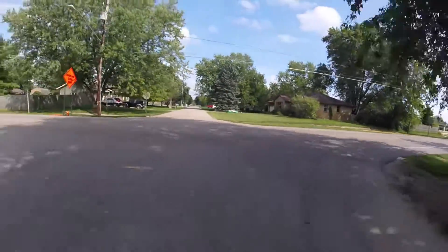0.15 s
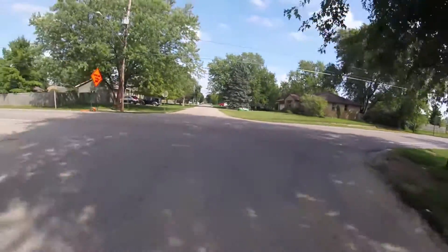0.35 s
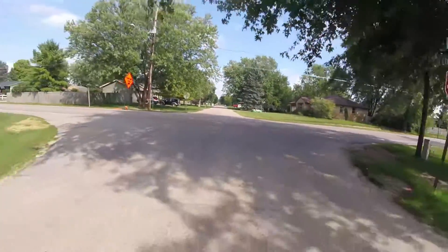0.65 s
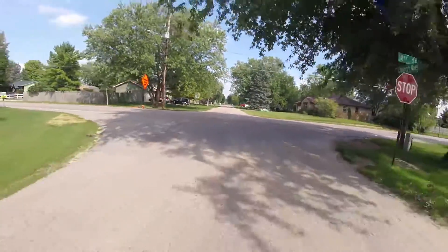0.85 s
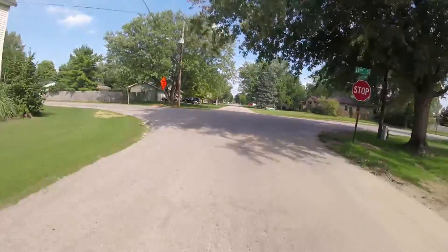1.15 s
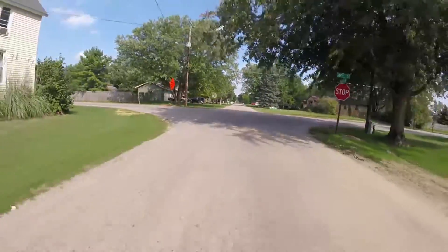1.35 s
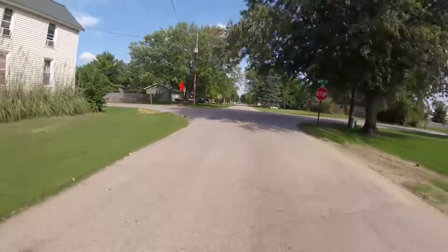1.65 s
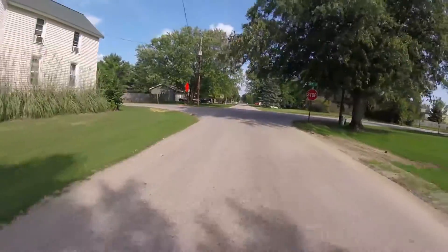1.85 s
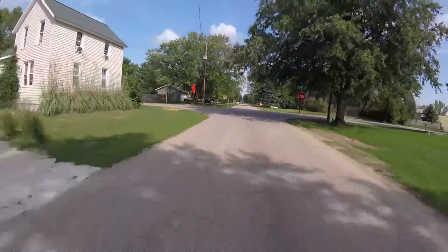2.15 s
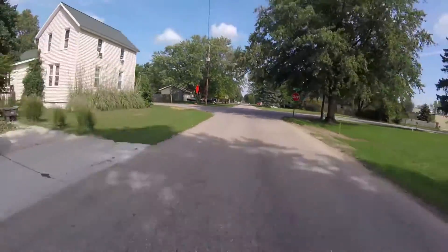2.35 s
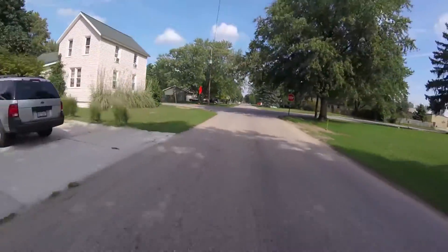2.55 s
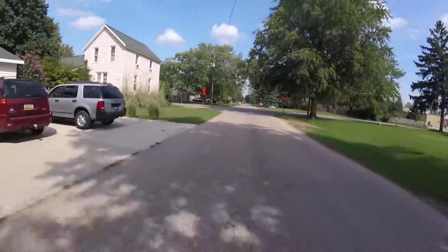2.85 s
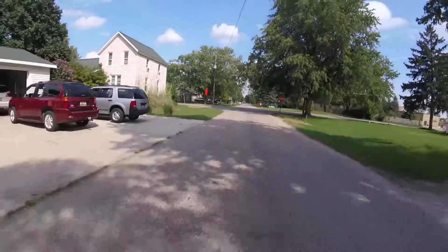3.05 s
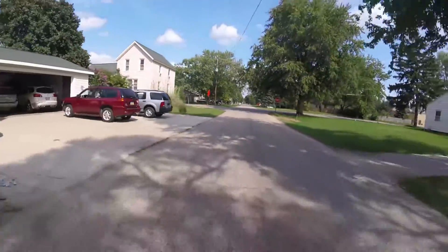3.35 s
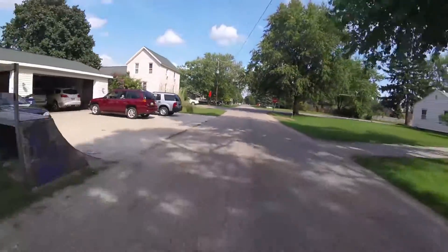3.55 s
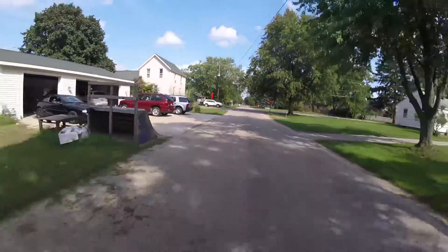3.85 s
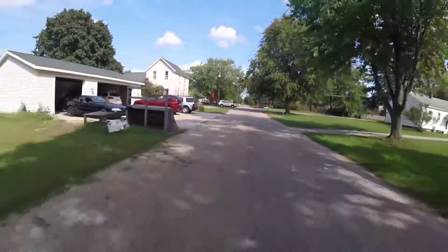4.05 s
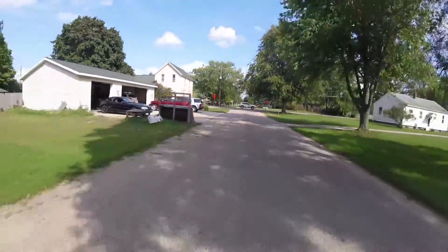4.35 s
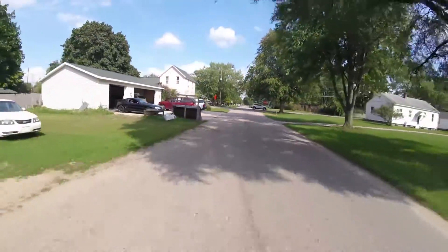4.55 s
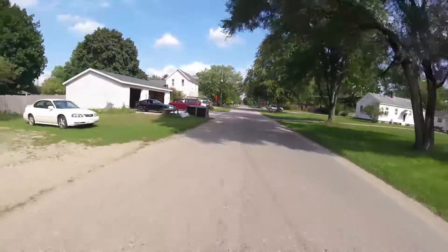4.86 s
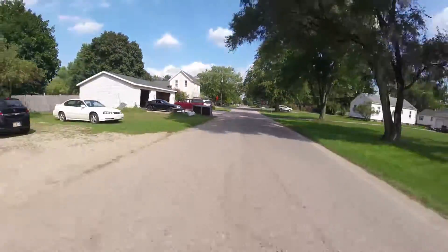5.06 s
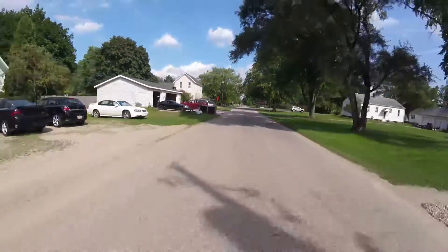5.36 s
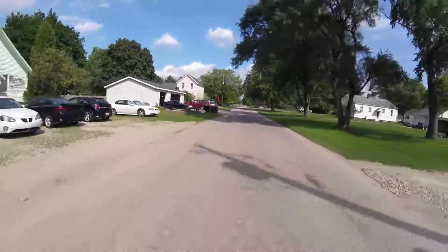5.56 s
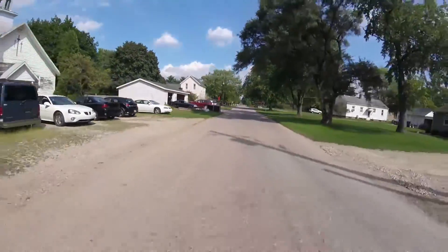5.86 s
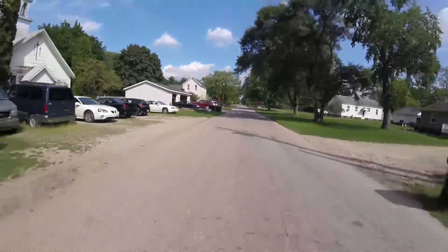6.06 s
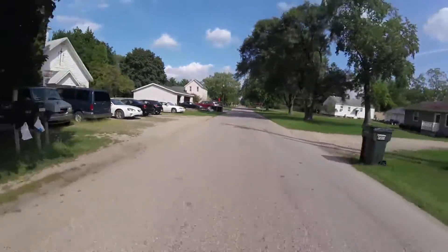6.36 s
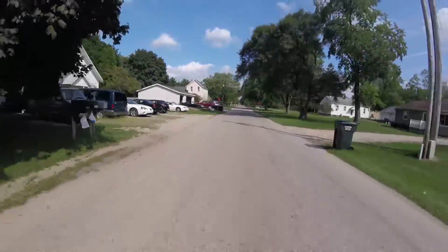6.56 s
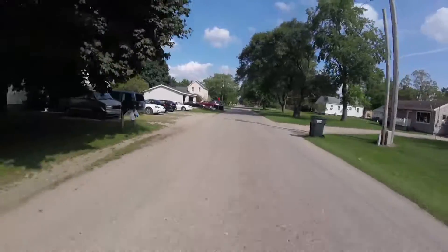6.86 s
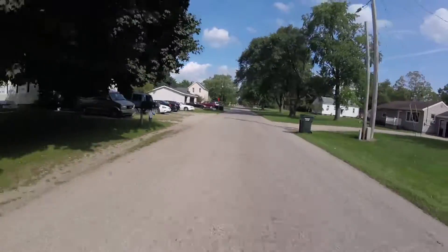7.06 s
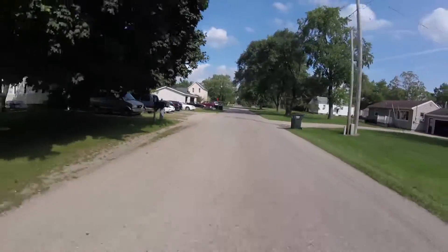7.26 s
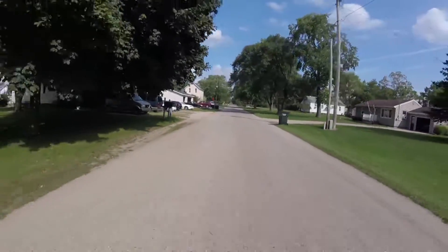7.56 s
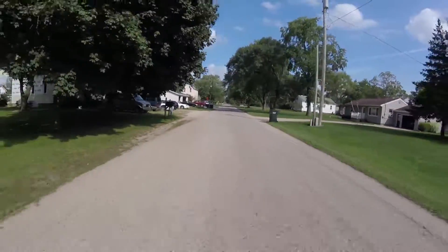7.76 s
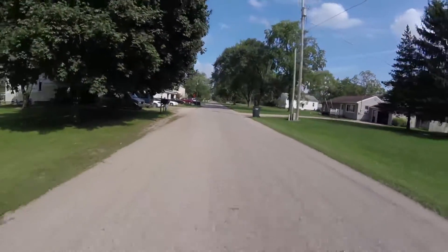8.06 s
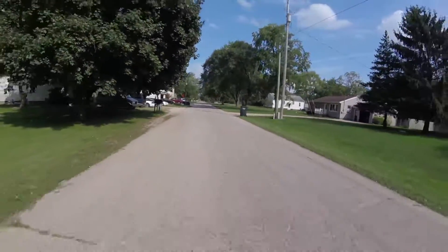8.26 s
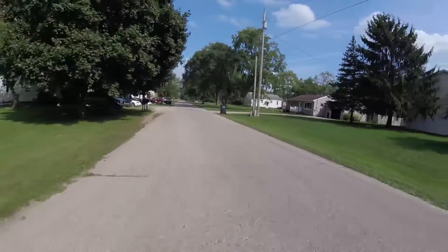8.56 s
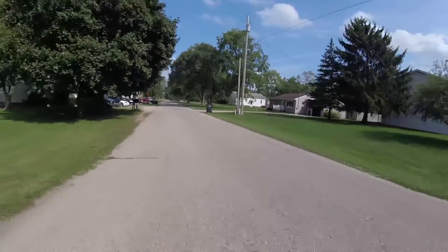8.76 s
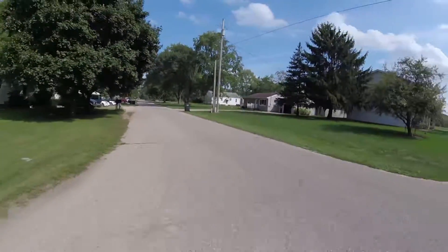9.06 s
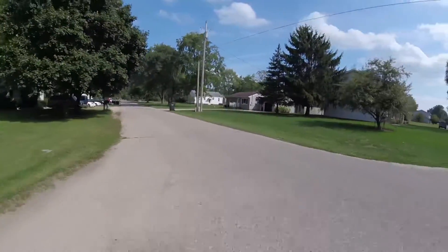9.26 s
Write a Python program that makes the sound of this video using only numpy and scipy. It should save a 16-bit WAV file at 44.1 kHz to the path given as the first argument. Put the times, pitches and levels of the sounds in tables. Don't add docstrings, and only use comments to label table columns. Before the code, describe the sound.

A boxer-engined car pulls hard with a throbbing, barking exhaust, lifts off into a sinking drone with burbles, as wind buffets and road joints thump.

```python
import sys
import numpy as np
from scipy import signal
from scipy.fft import rfft, irfft, next_fast_len
from scipy.io import wavfile
from scipy.ndimage import uniform_filter1d, map_coordinates

SR = 44100
rng = np.random.default_rng(int(sys.argv[2]) if len(sys.argv) > 2 else 0)


def amplitude_ratio(level_db):
    exponent = np.asarray(level_db, float) / 20
    return 10 ** exponent


def file_out(sig):
    cols = np.atleast_2d(sig).T
    lim = np.clip(cols, -1, 1)
    pcm = np.round(lim * 32767).astype(np.int16)
    wavfile.write(sys.argv[1], SR, pcm)


N = 414960

# time_s, firing_rate_hz
ENGINE_SPEED = [(0.0, 50.05), (0.4, 53.45), (0.6, 54.54), (1.0, 57.88), (2.2, 65.72), (3.0, 70.71),
                (3.4, 72.64), (3.8, 72.08), (4.2, 70.68), (4.6, 70.62), (5.4, 68.04), (5.8, 64.92),
                (7.2, 51.18), (7.6, 46.55), (8.2, 43.89), (8.6, 44.41), (9.2, 46.88), (9.41, 50.48)]
# time_s, load (0-1), burble_db of every other firing, firing_scatter_db
THROTTLE = [(0, 1, -48, .4), (3.34, 1, -48, .4), (3.56, 0, -33, 2.2), (4.15, 0, -38, 2), (4.35, 0, -29, 2),
            (4.95, 0, -25, 1.4), (5.15, 0, -42, .6), (7.2, 0, -45, .6), (7.9, 0, -36, 1.4),
            (8.4, 0, -45, .8), (9.19, 0, -45, 1.2), (9.34, 1, -45, .7)]
# time_s, level_db
FIRING_STRENGTH = [(0, 0), (3.28, 0), (3.45, -5), (3.62, -6), (3.9, -9), (4.05, -5.5), (4.2, -7.5),
                   (4.4, -5), (4.8, -2.5), (4.98, -4), (5.12, -0.5), (5.6, 0), (7.3, 0.5), (8.2, 0),
                   (8.68, -1), (8.9, -3.5), (9.3, -9.5), (9.41, -3.5)]
# frequency_hz, gain_db
LONG_PIPE = [(44, -17), (55, -14), (72, -15), (90, -15), (105, -12), (120, -15), (160, -18), (210, -28)]
# loaded_db, overrun_db, loss (dB lost per dB of weaker firing)
OVERTONES = [
    (0, -4.5, 2.5),
    (-5, -13.5, 2),
]


def low_orders_db():
    rate_hz = curves(ENGINE_SPEED)[0]
    strength_db = curves(FIRING_STRENGTH)[0]
    pull = np.abs(curves(THROTTLE)[0]) ** .25
    levels_db = [along(LONG_PIPE, rate_hz) + strength_db]
    for k, (loaded_db, overrun_db, loss) in enumerate(OVERTONES, start=2):
        loaded = loaded_db + .45 * strength_db
        overrun = overrun_db + loss * strength_db
        levels_db.append(along(LONG_PIPE, k * rate_hz) + pull * loaded + (1 - pull) * overrun)
    return levels_db


# frequency_hz, gain_db
MUFFLER = [(200, -31), (250, -27.5), (290, -36), (335, -46.5), (385, -35), (440, -55.5), (510, -40.5),
           (570, -48.5), (640, -43.5), (720, -53)]
# time_s, level_db
FRONT_LEVEL = [(0, -12.5), (.22, -6.5), (.62, -6), (.72, -1), (1, 0), (2.4, 1.5), (3.15, -2), (3.52, -9),
               (9.41, -16.5)]
# place in the four-firing cycle (0-1), level_db
CYLINDERS = [
    (.012, 0),
    (.285, -13),
    (.55, -16),
    (.775, -12),
]


def drone(firings):
    first_db, second_db, third_db = low_orders_db()
    load, burble_db, scatter_db = curves(THROTTLE)
    rate_hz = curves(ENGINE_SPEED)[0]
    cycle = 2 * np.pi * (firings / len(CYLINDERS) - .1)
    size = 1 + .23 * load * np.cos(cycle)
    firings = firings + .012 * load * np.cos(cycle)
    ahead = .006 * (rate_hz - 62) * load
    lead, delay = .25 - .45 * load, .07 + .165 * load

    def order(k):
        scatter = amplitude_ratio(scatter_db * wobble(.6 * firings))
        turns = k * (firings + ahead) + lead - delay * (k - 1)
        return scatter * np.cos(2 * np.pi * turns)

    sound = amplitude_ratio(first_db + scatter_db * wobble(.5 * firings)) * np.cos(2 * np.pi * firings)
    sound = sound + amplitude_ratio(second_db) * order(2) + amplitude_ratio(third_db) * order(3)
    upper_db = .7 * curves(FRONT_LEVEL)[0] - 20 * (1 - load)
    for k in range(4, 10):
        sound = sound + amplitude_ratio(along(MUFFLER, k * rate_hz) + upper_db) * order(k)
    bank = np.pi * (firings + 1)
    burble = amplitude_ratio(burble_db + 1.5 * wobble(.3 * firings)) * (np.cos(bank) + np.cos(3 * bank))
    return size * sound + burble


# frequency_hz, width_hz, gain_db
TAILPIPE = [(513, 83, -3), (653, 68, 3), (867, 99, -4), (1320, 76, -9.5)]


def bark(firings):
    place, level_db = np.transpose(CYLINDERS)
    cycles = np.arange(int(firings[-1] / len(place)))[:, None]
    chance = rng.standard_normal((len(cycles), 2, len(place)))
    ahead = .01 * (np.maximum.accumulate(curves(ENGINE_SPEED)[0]) - 57)
    arrival = len(place) * (cycles + place + .0012 * chance[:, 0])
    at = np.searchsorted(firings + ahead, arrival)
    heights = amplitude_ratio(level_db + [.6, 2, 2, 2] * chance[:, 1])
    fronts = np.bincount(at.ravel(), heights.ravel(), N)[:N]
    fronts = fronts * amplitude_ratio(curves(FRONT_LEVEL)[0] + 17.5) * curves(THROTTLE)[0]

    def pipe(f):
        total = 0
        for k, (hz, width_hz, gain_db) in enumerate(TAILPIPE):
            damping = 1j * f * width_hz
            total = total + (-1) ** k * amplitude_ratio(gain_db) * damping / (hz * hz - f * f + damping)
        return total

    def slope(f, hz):
        return 1 / (hz * hz - f * f + 1.4j * f * hz)

    def radiated(f):
        wadding = (950 ** 2 * slope(f, 950)) ** 2.5
        short_pipe = f * f * slope(f, 430)
        return pipe(f) * wadding * short_pipe

    return filtered(fronts, radiated)


# frequency_hz, density_db
BUFFET_SPECTRUM = [(8, -24), (16, -9), (33, 1), (60, -1), (110, -1.5), (170, -4), (260, -11.5), (400, -26),
                   (800, -57.5), (1500, -120)]
TYRE_SPECTRUM = [(180, -28.5), (300, -5.5), (380, -2.5), (435, -4), (500, -5.5), (590, -9), (750, -7),
                 (883, -6.5), (1060, -9.5), (1220, -18.5), (1400, -16), (1700, -24.5), (2380, -32.5),
                 (3900, -47.5), (6600, -120)]
HISS_SPECTRUM = [(880, -29), (1500, -1.5), (2270, -3.5), (3770, -6.5), (4620, -13.5), (5600, -18.5),
                 (7280, -55), (12300, -120)]
HOUSING_SPECTRUM = [(2900, -36.5), (5000, -11.5), (5800, -11), (6200, -4), (6490, 1), (6800, -4),
                    (7300, -6.5), (9000, -10.5), (10200, -19), (12300, -15.5), (13200, -20), (14000, -30),
                    (15000, -60.5)]
# centre_s, rise_db over the steady buffeting, length_s
GUSTS = [(.6, 4.5, .15), (1.5, 2.5, .25), (2.2, 5, .3), (3.0, 6, .12), (4.6, 2.5, .3), (5.1, 4, .25),
         (5.55, 3.5, .12), (6.0, 2.5, 0.22), (6.6, .5, 0.22), (7.5, 3, 0.33), (8.15, 3, .3),
         (9.41, 5, 0.073)]
# time_s, level_db
HEADWIND = [(0, 0.5), (3.4, -1), (4.3, 0), (5.3, -2), (6.6, 2), (7.3, 1), (8.1, -2.5), (8.6, -1), (9, 1),
            (9.41, -1.5)]
# time_s, gain_db
GAIN_CONTROL = [(0, -1), (.5, -2), (1.8, -4), (3.1, -2), (3.9, -1), (4.7, 0), (5.4, 0.05), (9.41, 0.5)]


def road():
    seconds = np.arange(N) / SR
    doublings = np.log2(curves(ENGINE_SPEED)[0] / 60)
    load, gain_db = curves(THROTTLE)[0], curves(GAIN_CONTROL)[0]

    buffet_db = -30 + 4 * doublings - 1.5 * load + .93 * wobble(13 * seconds)
    for centre_s, rise_db, length_s in GUSTS:
        buffet_db = buffet_db + rise_db * np.exp(-((seconds - centre_s) / length_s) ** 2)
    roar_db = -43 + 12 * doublings + 2 * load + gain_db + .26 * wobble(14 * seconds)
    hiss_db = -59 + 6 * doublings + gain_db + curves(HEADWIND)[0] + .49 * wobble(6 * seconds)

    buffet = amplitude_ratio(buffet_db) * rush(BUFFET_SPECTRUM, patchy_db=.7)
    roar = amplitude_ratio(roar_db) * rush(TYRE_SPECTRUM, patchy_db=.5)
    hiss = amplitude_ratio(hiss_db) * rush(HISS_SPECTRUM, patchy_db=.76)
    housing = amplitude_ratio(-67 + gain_db) * rush(HOUSING_SPECTRUM, patchy_db=1.2)
    return buffet + roar + hiss + housing


# start_s, peak_db, pitch_hz
THUMPS = [(2.441, -30, 45.4), (3.566, -15, 102), (6.609, -7.5, 44.6), (6.697, -13, 40), (7.258, -20, 78.6),
          (7.387, -13, 89.5), (7.462, -7, 61.3), (7.733, -17, 91.5), (7.821, -22, 100), (7.893, -6.5, 109),
          (7.946, -4, 65.3), (8.11, -22, 40), (8.206, -5, 61.4)]


def thumps():
    out, t = np.zeros(N + SR), np.arange(SR // 5) / SR
    for start_s, peak_db, pitch_hz in THUMPS:
        swell = t * pitch_hz * 3 * np.exp(-t * pitch_hz * 3.04)
        swing = np.sin(2 * np.pi * pitch_hz * t)
        out[round(start_s * SR):][:len(t)] += amplitude_ratio(peak_db + 6.5) * swell * swing
    return out[:N]


# centre_s, level_db, centre_hz, width_hz, length_s
PUFFS = [(3.352, -54.5, 2300, 3300, 0.075), (3.355, -44.5, 2000, 3000, 0.0026),
         (3.75, -60, 8000, 9000, .0015), (3.955, -61, 6960, 5000, 0.0017),
         (4.222, -62.5, 3500, 6000, .0015), (4.237, -60, 5000, 6000, .0015), (4.688, -64, 6000, 3000, .002),
         (7.916, -56, 4000, 7000, .0015), (8.805, -47, 1300, 3800, .0025), (8.85, -55, 1870, 900, 0.033),
         (8.969, -49, 1300, 3600, .004), (9.02, -51, 950, 400, 0.048), (9.26, -47, 970, 400, 0.035),
         (9.27, -52.5, 2000, 2500, 0.022), (9.33, -57, 2500, 2500, .02), (3.6, -36, 111, 200, 0.054),
         (4.15, -35.5, 199, 200, .06), (5.4, -36, 196, 200, 0.085), (6.63, -28.5, 201, 250, 0.028),
         (7.15, -34, 198, 198, 0.015), (7.41, -29.5, 180, 220, 0.036), (7.8, -33, 219, 250, 0.03),
         (7.92, -34, 220, 300, 0.024), (7.97, -34, 214, 250, 0.018)]


def puffs():
    out, t = np.zeros(N + SR), np.arange(SR // 5) / SR
    f = np.fft.rfftfreq(len(t), 1 / SR)
    for centre_s, level_db, centre_hz, width_hz, length_s in PUFFS:
        band = 1 + ((f - centre_hz) / (width_hz / 2)) ** 4
        air = unit(irfft(rfft(rng.standard_normal(len(t))) / band, len(t)))
        bell = np.exp(-((t - .1) / length_s) ** 2)
        out[round((centre_s - .1) * SR):][:len(t)] += amplitude_ratio(level_db) * air * bell
    return out[:N]


# start_s, level_db, start_hz, end_hz, length_s
CHIRPS = [(.14, -65, 4900, 4500, .02), (3.752, -60, 4600, 4200, .012), (3.777, -63, 4930, 4300, .022),
          (3.822, -58, 4900, 4100, 0.025), (4.035, -66, 5000, 4700, .015), (4.07, -67, 5000, 4700, .015),
          (4.183, -62, 4700, 4100, .03), (4.362, -67, 5100, 4800, .015), (4.53, -62, 4600, 4200, .018),
          (4.575, -63, 4600, 4200, 0.016), (4.67, -65, 5500, 5200, .015), (4.772, -65, 5000, 4700, .018),
          (4.812, -68, 5000, 4700, .018)]


def chirps():
    out, t = np.zeros(N + SR), np.arange(SR // 5) / SR
    for start_s, level_db, start_hz, end_hz, length_s in CHIRPS:
        u = np.clip(t / length_s, 0, 1)
        turns = np.cumsum(start_hz + (end_hz - start_hz) * u) / SR
        whistle = np.sin(np.pi * u) * np.sin(2 * np.pi * turns)
        out[round(start_s * SR):][:len(t)] += amplitude_ratio(level_db) * whistle
    return out[:N]


def unit(x):
    return x / np.sqrt(np.mean(x ** 2) + 1e-20)


def curves(rows):
    s, *columns = np.transpose(rows)
    t = np.arange(N) / SR
    return [uniform_filter1d(np.interp(t, s, c), size=441) for c in columns]


def along(points, hz):
    f, v = np.transpose(points)
    return np.interp(np.log(hz + 1), np.log(f + 1), v)


def wobble(position):
    knots = rng.standard_normal(int(position[-1]) + 4)
    return map_coordinates(knots, [np.abs(position)])


def filtered(x, response):
    m = next_fast_len(N + SR // 2)
    return irfft(rfft(x, m) * response(np.fft.rfftfreq(m, 1 / SR)), m)[:N]


def rush(spectrum, patchy_db):
    z = signal.stft(rng.standard_normal(N), nperseg=512)[2]
    field = uniform_filter1d(rng.standard_normal(z.shape), size=5, axis=0)
    field = uniform_filter1d(field, size=10, axis=1)
    patchy = signal.istft(z * amplitude_ratio(patchy_db * unit(field)), nperseg=512)[1][:N]
    return unit(filtered(patchy, lambda f: amplitude_ratio(along(spectrum, f))))


def scene():
    firings = -.3077 + np.cumsum(curves(ENGINE_SPEED)[0]) / SR
    engine = drone(firings) + bark(firings)
    return (engine + road() + thumps() + puffs() + chirps())[None]


def band_limit(x):
    return signal.sosfilt(signal.butter(12, 15670, fs=SR, output="sos"), x)


def record(dry):
    soft = dry / (1 + np.abs(dry / .56) ** 6) ** (1 / 6)
    return band_limit(soft)


dry = scene()
out = record(dry)
file_out(out)
```